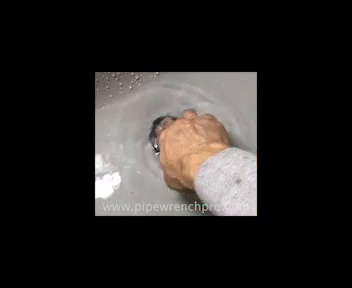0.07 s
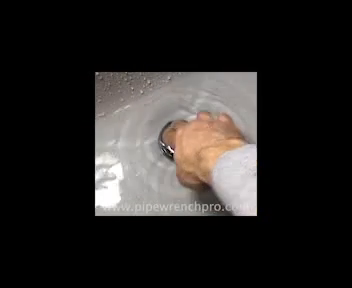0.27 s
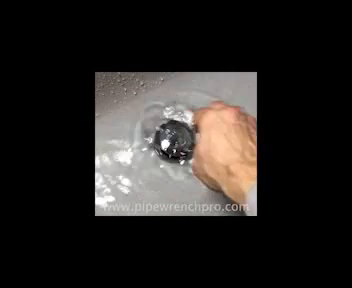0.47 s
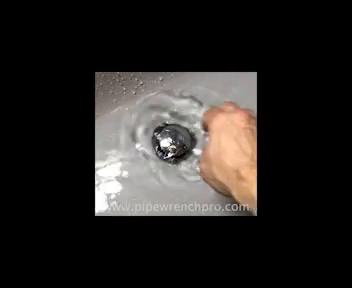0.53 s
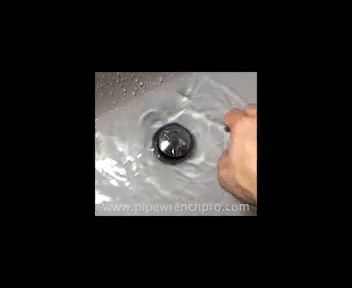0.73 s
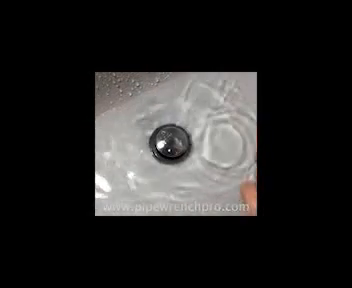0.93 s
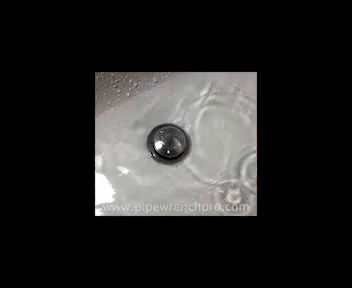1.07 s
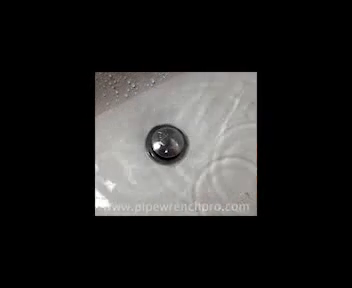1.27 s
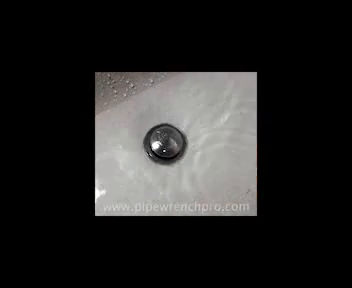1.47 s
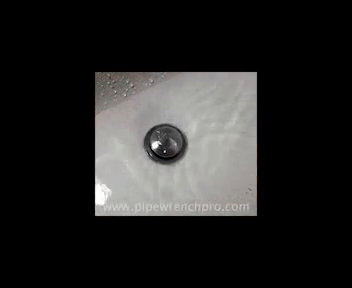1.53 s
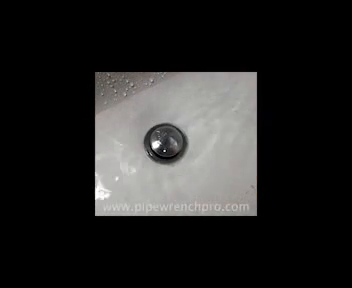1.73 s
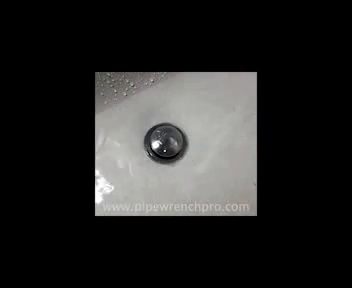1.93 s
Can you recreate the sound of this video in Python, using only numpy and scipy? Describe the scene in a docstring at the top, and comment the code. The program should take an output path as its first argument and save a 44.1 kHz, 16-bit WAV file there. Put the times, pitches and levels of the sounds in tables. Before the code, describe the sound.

Water splashes and glugs softly around a bathtub stopper. Drops tick faintly on the metal, ripples settle, and the drain bubbles, all close by with a slight hollow ring from the tub and a short bathroom echo.

```python
"""Bathtub stopper in shallow water

A hand works the drain stopper and lifts away. Trapped air booms under the stopper, water slaps
and sprays, drops from the hand tick on the metal, ripples run back and bubbles glug in the drain.
The tub rings along in a small, quiet bathroom."""
import sys
import numpy as np
from scipy import signal
from scipy.fft import rfft, irfft
from scipy.io import wavfile

SR = 44100
rng = np.random.default_rng(int(sys.argv[2]) if len(sys.argv) > 2 else 0)


def unload_wav(signal):
    """Save mono or channel-first audio to the path in sys.argv[1] as 16-bit WAV at rate SR, clipped to [-1, 1]."""
    wavfile.write(
        sys.argv[1],
        SR,
        np.round(np.clip(np.atleast_2d(signal).T, -1, 1) * 32767).astype(np.int16),
    )


N = 88200


def undb(db):
    """Decibels to gain."""
    return 10 ** (np.asarray(db) / 20)


def unit(x):
    """Scale to rms 1."""
    return x / np.sqrt(np.mean(x ** 2) + 1e-20)


def colour(x, spectrum):
    """Filter by (frequency [Hz], gain [dB]) points; scale to rms 1."""
    hz, db = np.array(spectrum).T
    bin_hz = np.maximum(np.arange(N // 2 + 1) * SR / N, 1)
    gain = undb(np.interp(np.log(bin_hz), np.log(hz), db))
    return unit(irfft(rfft(x) * gain, N))


def since(start_s):
    """Seconds since start_s, zero before."""
    return np.maximum(np.arange(N) / SR - start_s, 0)


def decay(t60_s):
    """Exponential fall, 60 dB in t60_s."""
    return np.exp(-np.log(1000) * since(0) / t60_s)


def room_rumble(rms_db=-62):
    """Steady low background noise."""
    # (frequency [Hz], gain [dB])
    rumble_spectrum = [(25, -54), (38, -23), (49, 2.5), (62, -3), (100, -2.5), (160, 3), (250, -10.5),
                       (400, -20.5), (800, -35), (1500, -39), (4000, -49), (11000, -70.5)]
    return undb(rms_db) * colour(rng.standard_normal(N), rumble_spectrum)


def bubble(start_s, hz, db, life_s, pitch_rise, swell_cycles=.65, fade_power=1.62):
    """Trapped air swells within about a cycle, then fades as its pitch climbs."""
    t = since(start_s)
    pitch_hz = hz * (1 + pitch_rise * (1 - np.exp(-t / life_s)))
    swell = 1 - np.exp(-t * hz / swell_cycles)
    fade = np.exp(-(t / life_s) ** fade_power)
    return undb(db) * swell * fade * np.sin(2 * np.pi * np.cumsum(pitch_hz * (t > 0)) / SR)


def glugs():
    """Air pockets boom under the stopper; bubbles gurgle in the drain."""
    # (start [s], pitch [Hz], level [dB], life [s], pitch rise [fraction])
    air_pockets = [ (.183, 576, -65.5, 0.03, 0.033), (.185, 830, -66.5, 0.062, 0.021),
                   (.202, 110.7, -40.5, 0.12, 0.011), (.338, 808.4, -70.5, 0.06, 0.0067),
                   (0.411, 116.1, -35, 0.079, 0.019), (.410, 428, -46, 0.013, 0.12),
                   (.433, 769, -46.5, 0.011, 0.071), (0.569, 128.8, -51, 0.033, 0.0053),
                   (.658, 178.2, -39.5, 0.035, 0.19), (0.687, 155.3, -31, 0.012, 0.22),
                   (0.717, 190.6, -41.5, 0.015, 0.05), (.731, 930.6, -53.5, 0.029, 0.095),
                   (.744, 1329, -57, 0.018, 0.14), (.825, 240.6, -40, 0.025, 0.32),
                   (0.855, 247, -47, 0.023, 0.036), (.888, 269.4, -57.5, 0.097, 0.02),
                   (1.278, 735, -63, 0.022, 0.05), (1.303, 255.5, -37, 0.041, 0.2),
                   (1.315, 672, -58.5, 0.024, .03), (1.334, 115.7, -43.5, 0.016, 0.16),
                   (1.343, 233.2, -38, 0.048, 0.23), (1.368, 437, -64, 0.048, 0.73),
                   (1.403, 244.4, -36, 0.022, 0.17), (1.405, 120.4, -43, 0.025, 0.056),
                   (1.417, 690, -55.5, 0.011, 0.062), (1.453, 261.6, -47.5, 0.042, 0.019),
                   (1.464, 548.5, -62.5, 0.042, 0.42), (1.603, 236.3, -41.5, 0.036, 0.12),
                   (1.626, 557, -53, 0.016, 0.24), (1.645, 617, -54, 0.035, 0.044),
                   (1.685, 252.5, -54, 0.13, 0.036), (1.722, 612, -57.5, 0.027, 0.1),
                   (1.897, 542.5, -62.5, .032, 1.02), (1.919, 613.4, -55, 0.031, 0.13)]
    return sum(bubble(*row) for row in air_pockets)


def fizz(bubbles_per_s=4000, low_hz=500, high_hz=11000, decay_cycles=11):
    """Foam: a cloud of tiny bubbles of mixed size, each ringing briefly."""
    when, smallness, strength = rng.random((int(bubbles_per_s * N / SR), 3)).T[:, :, None]
    hz = low_hz * (high_hz / low_hz) ** smallness
    offsets = np.arange(800)
    cycles = hz * offsets / SR
    rings = hz * strength ** 2 * np.exp(-cycles / decay_cycles) * np.sin(2 * np.pi * cycles)
    positions = (when * N).astype(int) + offsets
    return unit(np.bincount(positions.ravel(), rings.ravel(), N)[:N])


def patter(spectrum, foam, drops_per_s=12000, scatter_db=3):
    """Dense droplet impacts of uneven size, mixed with ringing foam."""
    hits = rng.random(N) < drops_per_s / SR
    polarity = np.sign(rng.standard_normal(N))
    sizes = undb(scatter_db * rng.standard_normal(N))
    return colour(unit(hits * polarity * sizes) + foam, spectrum)


def splashes(foam):
    """Bursts of slapping water, spray and fine mist."""
    # (start [s], rise [s], decay [s], slap [dB], spray [dB], mist [dB])
    bursts = [ (0.185, 0.0049, 0.053, -66, -77, -89.5), (0.2, 0.0035, 0.012, -84, -65.5, -88),
              (0.291, 0.011, 0.081, -76.5, -86, -79), (0.316, 0.0032, 0.047, -81.5, -75, -97),
              (0.408, 0.00052, 0.028, -48.5, -58, -80.5), (0.43, 0.008, 0.028, -49, -76, -85.5),
              (0.48, 0.0016, 0.034, -64, -77.5, -91), (0.579, 0.002, 0.018, -61, -81, -81.5),
              (0.654, 0.0019, 0.019, -63, -83.5, -75.5), (0.73, 0.00077, 0.087, -67.5, -89.5, -92),
              (0.821, 0.0051, 0.025, -79, -84, -76.5), (0.899, 0.024, 0.055, -66, -85.5, -88),
              (1.008, 0.15, 0.43, -71.5, -89.5, -92.5), (1.383, 0.032, 0.076, -66, -98, -101),
              (1.428, 0.00067, 0.017, -64.5, -72, -86), (1.602, 0.0011, 0.091, -65, -96.5, -104),
              (1.83, 0.047, 0.093, -66.5, -85.5, -100)]
    # layer spectra (frequency [Hz], gain [dB])
    slap = [(150, -26), (300, -11), (400, 3.5), (600, -4.5), (820, -7.5), (1100, -11.5), (1500, -20),
            (2100, -26), (3500, -79)]
    spray = [(700, -22), (1400, -18.5), (2000, 2.5), (2700, 9), (3600, 6.5), (4500, 4), (5100, -11.5),
             (8000, -19.5), (12000, -49.5)]
    mist = [(2500, -2), (3900, 8.5), (5500, 9), (7500, 8.5), (8500, 4), (9900, 6), (10500, -4.5),
            (12000, 9)]
    layers = np.array([patter(spectrum, foam) for spectrum in (slap, spray, mist)])
    out = np.zeros(N)
    for start_s, rise_s, decay_s, *layer_db in bursts:
        t = since(start_s)
        envelope = (1 - np.exp(-t / rise_s)) * np.exp(-t / decay_s)
        out += envelope * (undb(layer_db) @ layers)
    return out


def pings():
    """Single tiny bubbles ring high and short."""
    # (start [s], pitch [Hz], level [dB])
    tiny_bubbles = [(.333, 1880, -70), (.409, 2400, -55), (.413, 2700, -55), (.421, 3350, -57),
                    (.507, 1338, -59), (.582, 1960, -63), (.595, 3200, -68), (1.708, 1770, -71)]
    return sum(bubble(*row, life_s=.008, pitch_rise=.07) for row in tiny_bubbles)


def stopper_ticks(low_hz=3600, high_hz=4150, decay_s=.008):
    """Drops hit the wet metal stopper, which rings in one damped band."""
    # (time [s], rms at impact [dB])
    drops = [(.657, -69), (.686, -70), (.859, -67), (.945, -69), (1.708, -81), (1.925, -81)]
    band = signal.butter(2, (low_hz, high_hz), "band", fs=SR, output="sos")
    ring = unit(signal.sosfilt(band, rng.standard_normal(N)))
    envelope = sum(undb(db) * (since(hit_s) > 0) * np.exp(-since(hit_s) / decay_s) for hit_s, db in drops)
    return ring * envelope


def trickle(foam):
    """Water runs back in small ripples."""
    # (centre [s], 1/e half width [s], level [dB])
    ripples = [(1.135, 0.091, -63)]
    # low slosh, light babble (frequency [Hz], gain [dB])
    ripple_spectrum = [(90, 0), (150, 30), (350, 20), (650, -7), (1800, 0.5), (2600, -15), (4500, -44)]
    t = since(0)
    flow = sum(undb(db) * np.exp(-((t - centre_s) / half_s) ** 2) for centre_s, half_s, db in ripples)
    return flow * patter(ripple_spectrum, foam)


def tub_ring(water, gain_db=-2):
    """Tub and drain resonate, driven by the water."""
    # (frequency [Hz], relative gain [dB], t60 [s])
    modes = [(264, -9, .7), (394, 4, .5), (460, 3, .45), (580, 4, .35), (635, 0, .5), (693, 4, .5),
             (770, 4, .25), (813, 4, .25), (965, -2, .3), (1055, 4, .2), (1102, 0, .18)]
    response = np.zeros(N)
    for hz, db, t60_s in modes:
        norm = 2 * np.log(1000) / (t60_s * SR)  # unity gain at resonance
        response += undb(db) * norm * decay(t60_s) * np.cos(2 * np.pi * hz * since(0))
    return undb(gain_db) * signal.fftconvolve(water, response)[:N]


def room_echo(water, gain_db=-8, t60_s=.46, low_cut_hz=374):
    """Diffuse echo off hard walls, with the bass cut away."""
    highpass = signal.butter(2, low_cut_hz, "high", fs=SR, output="sos")
    noise = signal.sosfilt(highpass, rng.standard_normal(N))
    fade = decay(t60_s)
    response = noise * fade / np.linalg.norm(fade)
    return undb(gain_db) * signal.fftconvolve(water, response)[:N]


def scene():
    """Water sounds, tub ring and echo over the room rumble; mono."""
    foam = fizz()
    water = glugs() + splashes(foam) + pings() + trickle(foam) + stopper_ticks()
    return (room_rumble() + water + tub_ring(water) + room_echo(water))[None]


def record(dry, fade_s=.006, top_hz=12000):
    """Short fade at both ends, then a steep low-pass."""
    t = since(0)
    fade = np.minimum(np.minimum(t, t[::-1]) / fade_s, 1)
    lowpass = signal.ellip(8, .2, 70, top_hz, fs=SR, output="sos")
    return signal.sosfilt(lowpass, dry * fade)


dry = scene()
out = record(dry)
unload_wav(out)
```